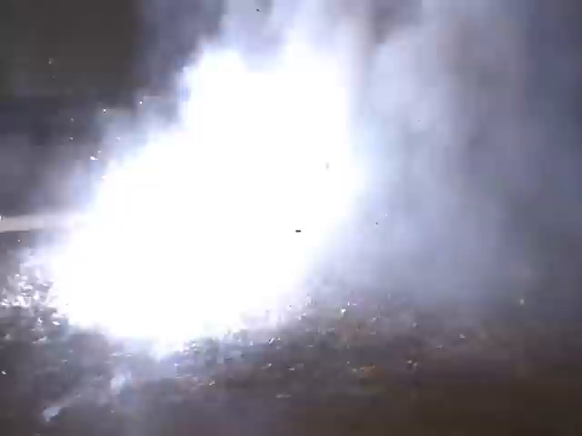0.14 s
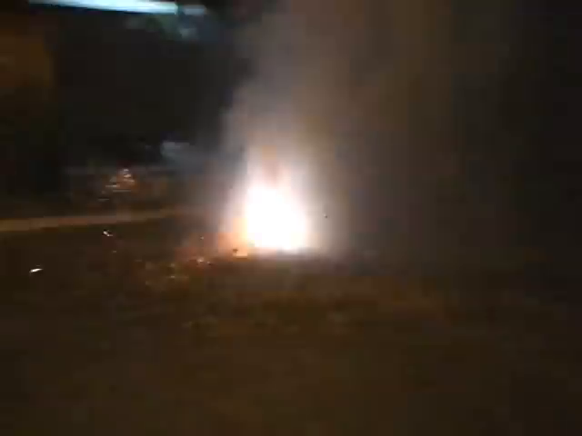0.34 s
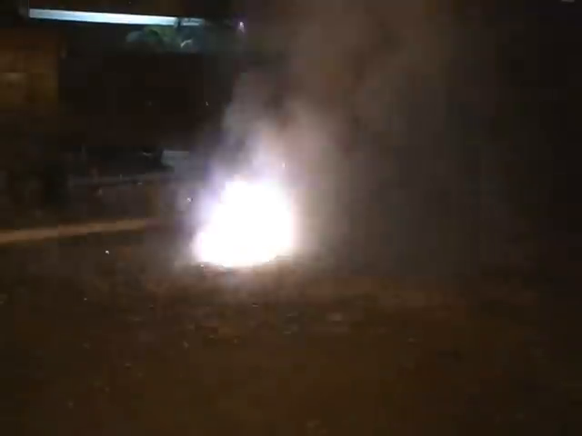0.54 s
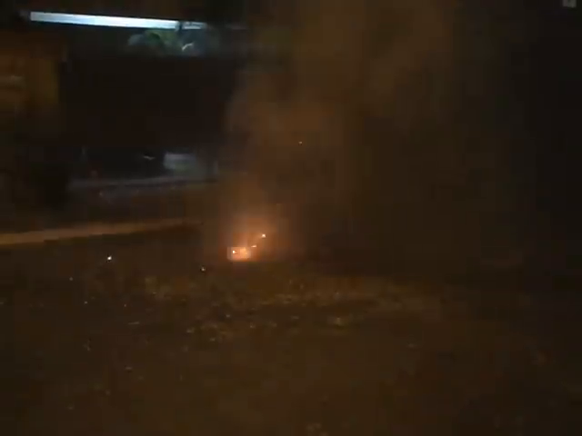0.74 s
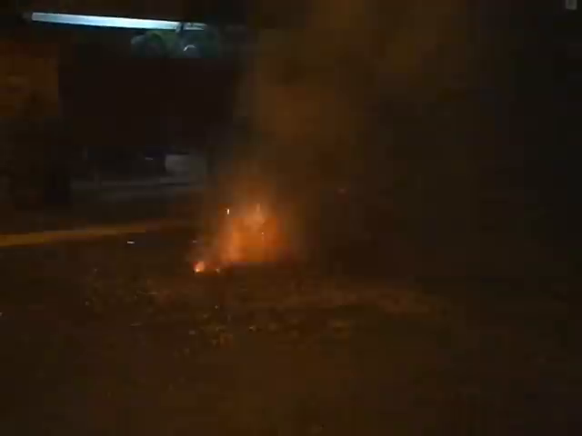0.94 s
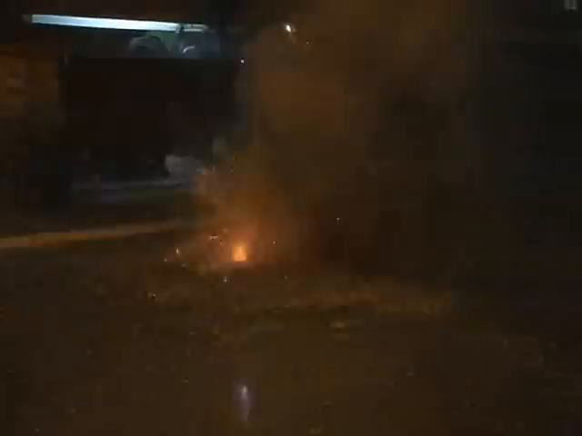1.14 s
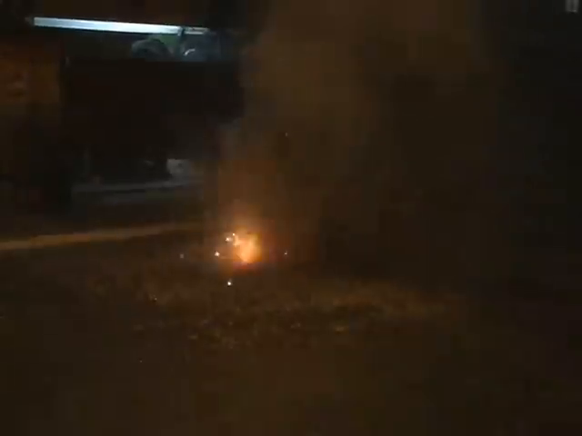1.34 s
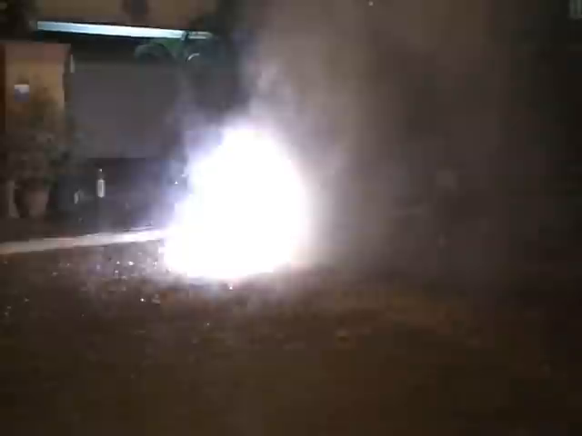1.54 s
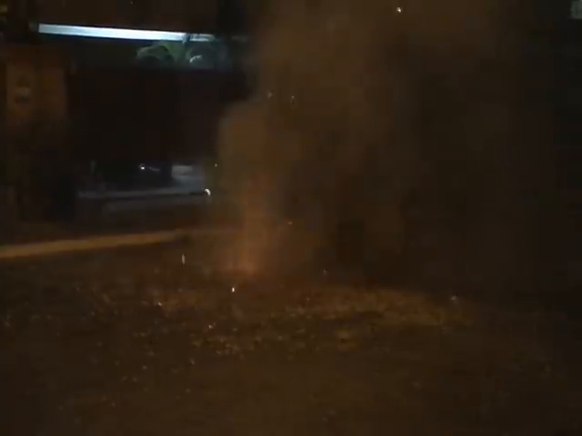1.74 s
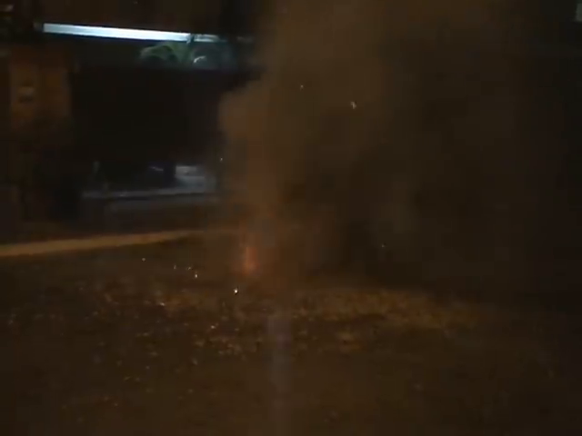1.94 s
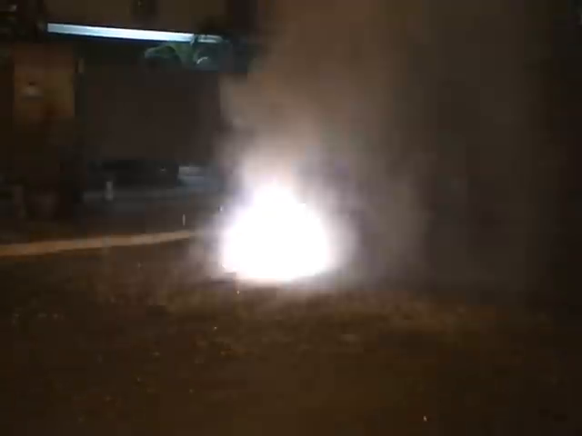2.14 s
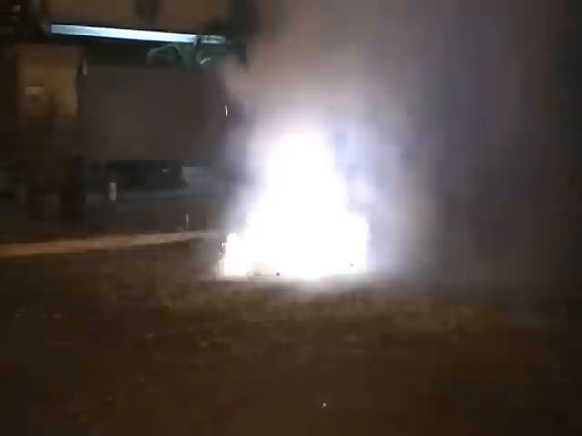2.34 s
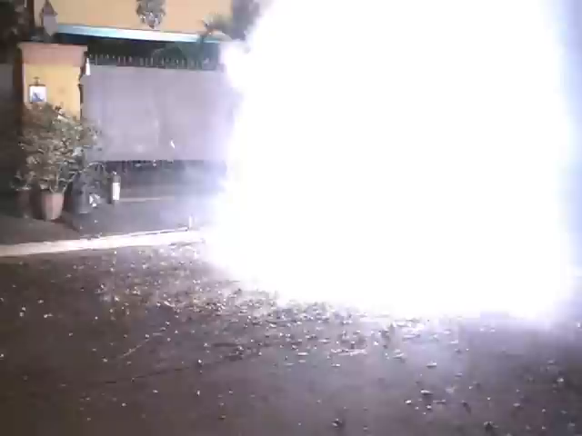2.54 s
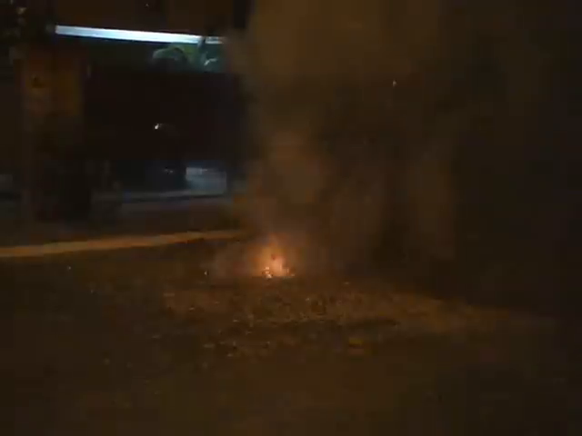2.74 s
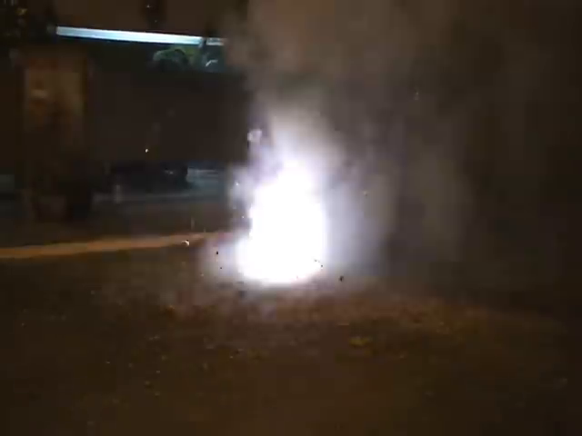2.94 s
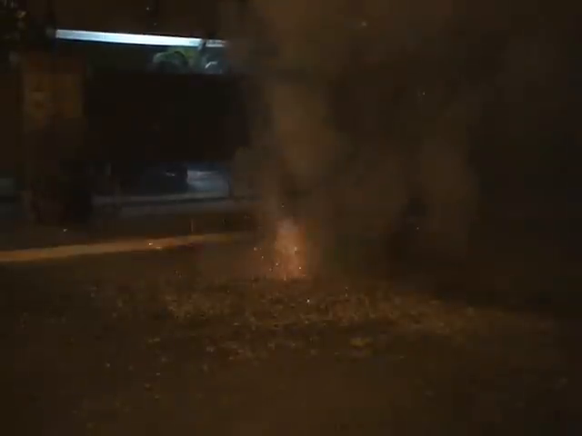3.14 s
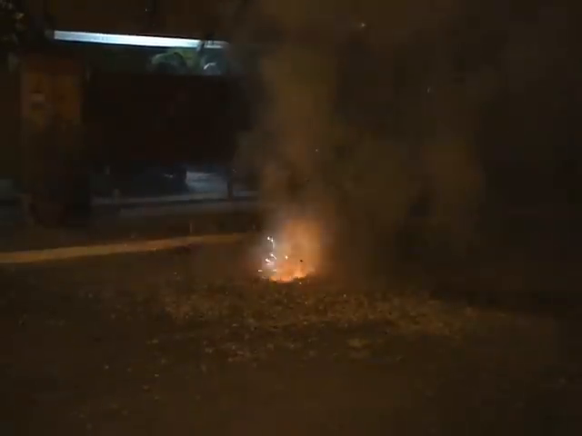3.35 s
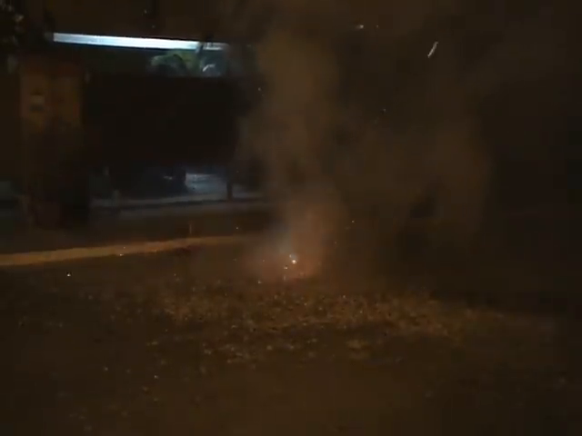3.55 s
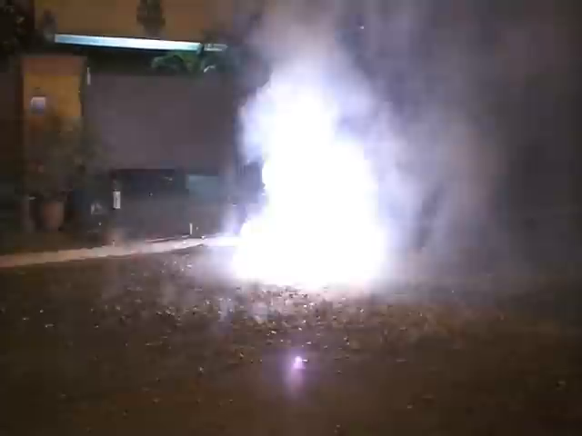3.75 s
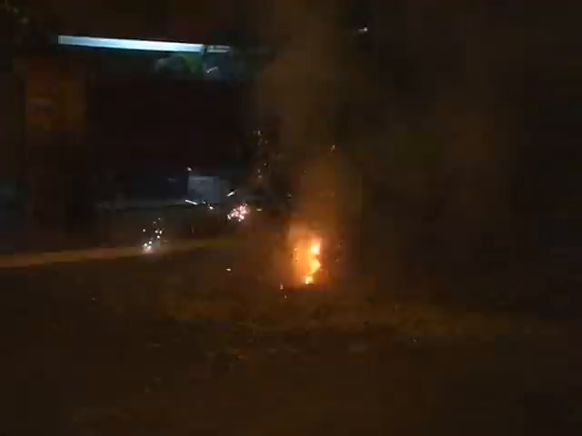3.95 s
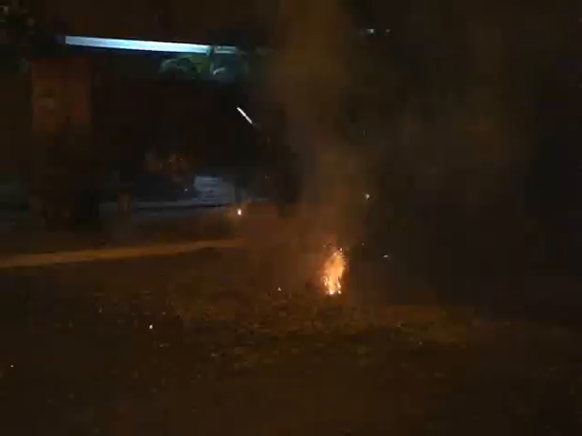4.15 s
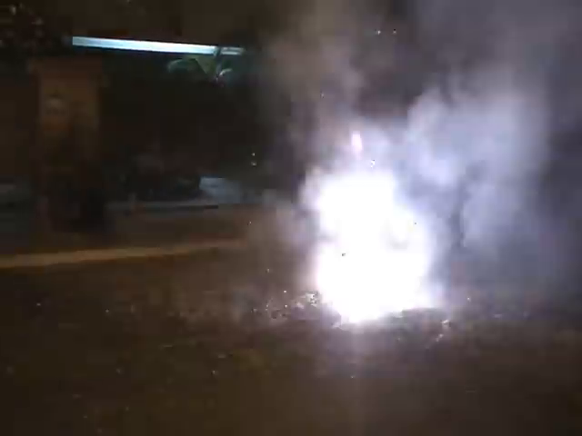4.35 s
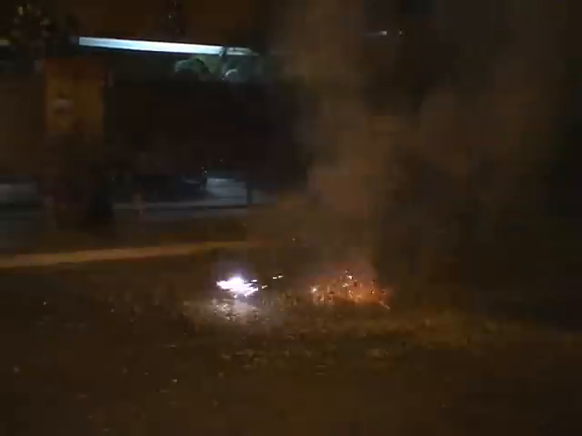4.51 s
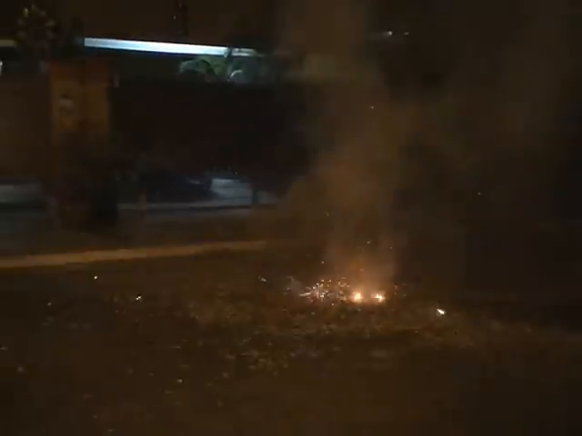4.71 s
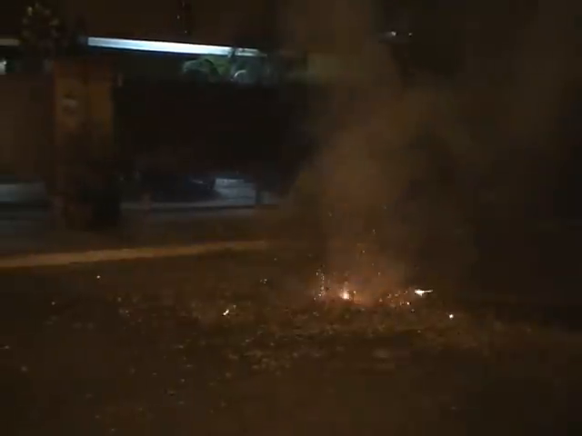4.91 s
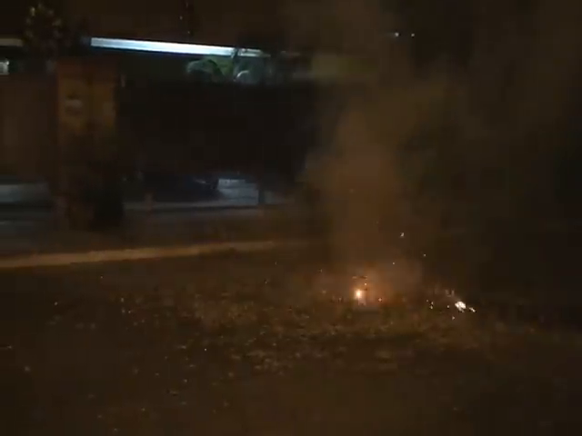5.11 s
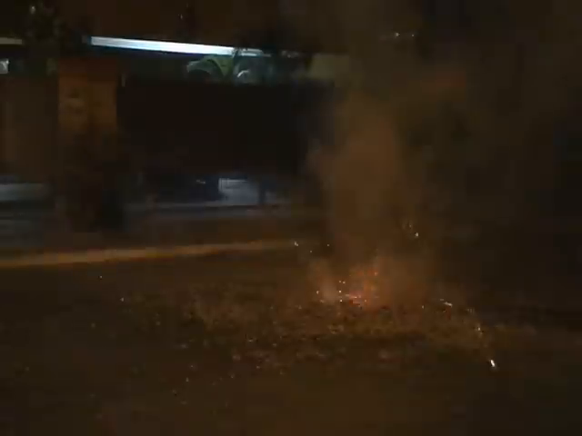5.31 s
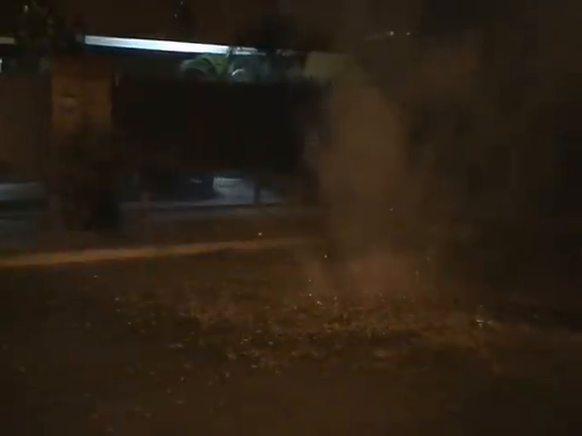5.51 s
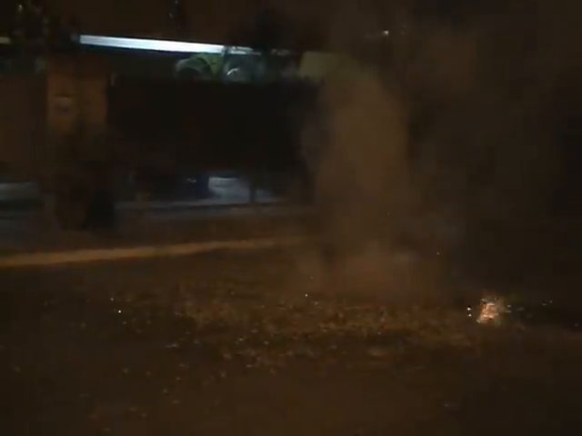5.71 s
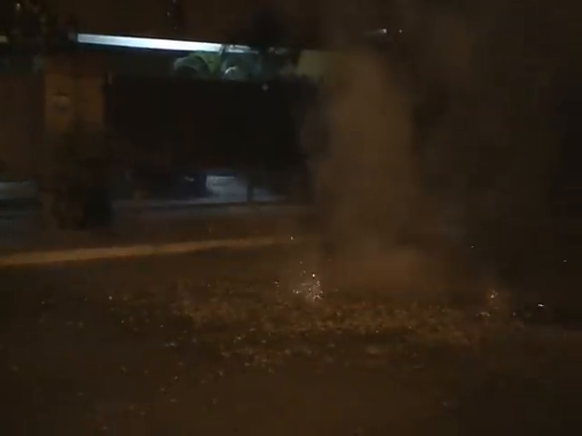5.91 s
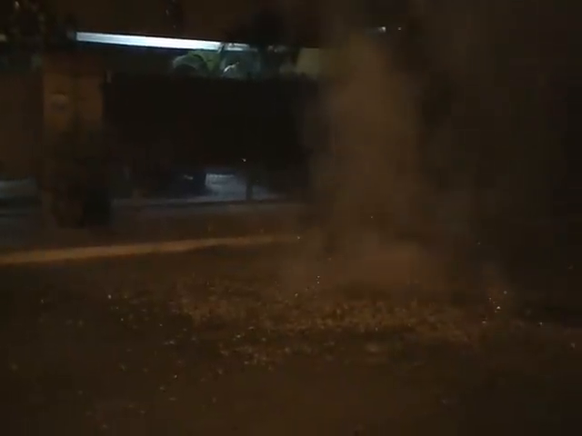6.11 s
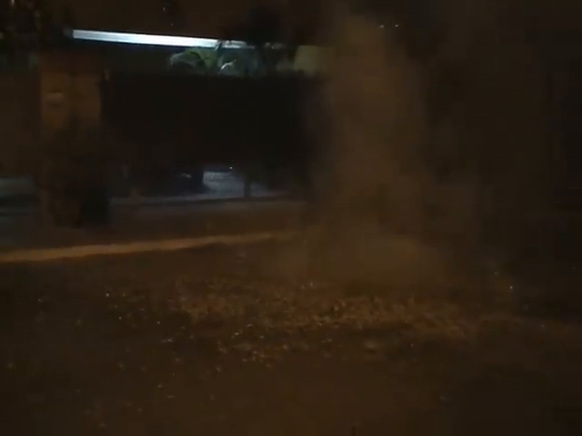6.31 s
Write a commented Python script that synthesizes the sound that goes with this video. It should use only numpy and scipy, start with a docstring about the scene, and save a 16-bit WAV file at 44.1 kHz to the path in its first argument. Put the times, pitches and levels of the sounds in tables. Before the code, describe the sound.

A long firecracker string explodes a few metres from overloaded stereo microphones on a street at night. It begins at 0 seconds with a sharp bang and a few quick followers, then more around 0.24 and 0.43. From 0.5 to 0.85 the cracks run together, and heavy thumping blasts hit near 0.93 and 1.0. Uneven clusters continue to 1.7, then a lull holds only a weak pop at 1.9. A deep, strong bang at 2.1 restarts the barrage, dense from 2.35 to 2.5 and 2.75 to 3.05. Scattered bangs follow until a thick, roaring run from 3.8 to 4.3. More bursts come from 4.5 to 4.75, and separate blasts from 4.85 to 5.4. A longer gap lets hollow house-front echoes fade toward a faint low rumble, before final cracks at about 5.84 to 5.98 and their decaying echo.

```python
"""A street at night, two microphones a few metres from a long string of firecrackers.
Each blast is a short pressure push with a deep thump; filtered noise and single reflections make
its echo between the house fronts. Overload flattens the peaks, so the bangs merge into a harsh
roar; where the fuse falters the echo dies away and the town's faint rumble is left."""
import sys
import numpy as np
from scipy import signal
from scipy.io import wavfile
from scipy.ndimage import uniform_filter1d

SR = 44100
rng = np.random.default_rng(int(sys.argv[2]) if len(sys.argv) > 2 else 0)


def put_to_file(sound):
    """Save the sound as 16-bit audio at rate SR, in the file named by the first command-line argument."""
    columns = np.atleast_2d(sound).T  # one column per channel
    safe = np.clip(columns, -1, 1)
    whole_steps = np.round(safe * 32767)
    wavfile.write(sys.argv[1], SR, whole_steps.astype(np.int16))


N = 280915  # length in samples

# crackers that stand out, most of them after a pause of the fuse:
# [t/s, level/dB before the street's gain, length of the push/ms, low thump level/dB]
SINGLE_BANGS = [ (0.000, 12.5, .29, -19), (0.237, 11, 0.22, -12), (0.429, 17, 0.23, -1),
                (0.928, 16.5, .2, 7.5), (0.995, 19, 0.24, 9), (1.157, 15, .17, -13), (1.408, 12, .19, 5),
                (1.583, 10, .19, 3), (1.675, 9, 0.21, 6), (1.716, 13.5, .2, 2), (1.915, 1.5, .18, -11),
                (2.1058, 15.5, 0.24, 10), (2.291, 11.5, .18, 5), (2.735, 14.5, 0.22, 3),
                (3.050, 15.5, 0.19, -2), (3.252, 6.5, 0.38, 3), (3.3895, 11.5, 0.28, -9),
                (3.715, 9.5, .21, -12), (4.302, 13, 0.22, -10), (4.5028, 12.5, 0.3, -13),
                (4.842, 10.5, .22, -2), (4.942, 14, .26, -7), (5.103, 14, .23, -1), (5.276, 12.5, 0.25, 2),
                (5.8371, 10.5, .2, -14), (5.979, 11, .29, -4)]
# stretches where the fuse runs freely and sets off one cracker after another:
# [first t/s, last t/s, middle level/dB before the street's gain, middle thump level/dB]
FUSE_RUNS = [ (0.054, 0.11, 13, -10), (0.251, 0.29, 9, -13), (0.50, 0.845, 9.5, -2), (1.039, 1.30, 9.5, -5),
             (1.44, 1.511, 2, -1), (2.139, 2.179, 8, -12), (2.352, 2.529, 12.5, -4), (2.61, 2.682, 5, -6),
             (2.78, 2.99, 13, -6), (3.437, 3.50, 10.5, -8), (3.80, 4.20, 15, -5), (4.58, 4.73, 12, -6),
             (5.344, 5.41, 9, -9), (5.861, 5.90, 3.5, -12)]


def crackers(spot_count=11):
    """The string jumps about as it burns: blasts leave from several spots, each with its own echoes."""
    spots = np.zeros((spot_count, N))
    thumps = np.zeros(N)
    echoes = [street() for _ in spots]
    fired = [tuple(row) for row in SINGLE_BANGS]
    for row in FUSE_RUNS:
        fired += run(*row)
    for k, (s, db, push_ms, thump_db) in enumerate(sorted(fired)):
        add(spots[k % spot_count], s, gain_of(db) * blast(push_ms))
        add(thumps, s, gain_of(thump_db) * thump())
    echoed = sum(signal.fftconvolve(spot[None], echo, axes=1)[:, :N] for spot, echo in zip(spots, echoes))
    return thumps + hollow(echoed)  # the thumps reach both microphones alike, without echo


FUSE_S = 0.062  # approximate spacing of the crackers in a run
FUSE_JITTER = 0.35  # largest share of FUSE_S by which an inner cracker comes early or late
STRENGTH_SPREAD_DB, THUMP_SPREAD_DB = 3.5, 8  # plus or minus: no two crackers are packed alike
PUSH_MS, PUSH_AT_DB = 0.2, 11  # middle length of the push for a blast of this level
PUSH_DOUBLES_DB = 25  # a stronger charge pushes for longer: twice as long for this much more level
PUSH_SPREAD_OCTAVES = 0.32  # plus or minus


def run(first_s, last_s, db, thump_db):
    """One run of the fuse, as rows like those of SINGLE_BANGS: uneven in time, charge, push and thump."""
    count = 1 + int(np.ceil((last_s - first_s) / FUSE_S - 0.5))
    late, charge, push, low = rng.uniform(-1, 1, (count, 4)).T
    times = np.linspace(first_s, last_s, count)
    times[1:-1] += FUSE_JITTER * FUSE_S * late[1:-1]
    strength_db = db + STRENGTH_SPREAD_DB * charge
    octaves = (strength_db - PUSH_AT_DB) / PUSH_DOUBLES_DB + PUSH_SPREAD_OCTAVES * push
    push_ms = PUSH_MS * 2 ** octaves
    return list(zip(times, strength_db, push_ms, thump_db + THUMP_SPREAD_DB * low))


def blast(push_ms, size=512):
    """A shock front, a short push and a longer suction, with unit energy."""
    u = np.arange(size) / SR * 1000 / push_ms  # time in push lengths
    decay = np.exp(-u)
    wave = (1 - u) * decay
    wave -= wave.sum() * decay / decay.sum()  # push and suction cancel
    return wave / np.linalg.norm(wave)


def thump(lowest_hz=47.74, highest_hz=109.12, t60=0.046, size=6000):
    """The ball of hot gas swells and falls back: a deep sine that dies within a few cycles."""
    t = np.arange(size) / SR
    hz = rng.uniform(lowest_hz, highest_hz)
    return np.sin(2 * np.pi * hz * t) * gain_of(-60 * t / t60)


# what the street gives back of a blast: [f/Hz, level/dB]
STREET_COLOUR = [(25, -17), (60, -16), (130, -8.5), (260, -4), (500, -2.5), (900, -1.5), (1650, -1.07),
                 (2150, -4), (2700, -5), (4500, -8.5), (8000, -8.5), (15000, -13)]
# how long the house fronts ring: [f/Hz, t60/s]
FRONT_RING = [(80, 0.79), (300, 0.42), (900, 0.6), (2500, 0.57), (6000, 0.57), (14000, 0.46)]
# likeness of the echoes at the two microphones: [f/Hz, correlation/1]
ECHO_LIKENESS = [(60, 1), (300, 1), (700, 0.96), (1400, .89), (3000, 0.75), (7000, 0.63), (15000, 0.35)]
# far echoes come back thin and dull: [f/Hz, level/dB]
FAR_COLOUR = [(100, -5), (400, 1.5), (900, -1.5), (2500, 0.5), (8000, -8), (15000, -14)]


def street(direct_db=20, wall_db=14, wall_fall_db=15, wall_s=0.09, wall_count=12,
           far_db=-32, far_t60=2.5, slap_db=-39, slap_s=0.5, slap_spread_s=0.011):
    """Paths to the two microphones: the direct one, single walls, dense scatter and far houses."""
    t = np.arange(SR) / SR  # echoes end after one second
    hz, age, (a, b) = signal.stft(rng.standard_normal((2, len(t))), SR, nperseg=256)
    same = np.clip(read(ECHO_LIKENESS, hz), 0, 1)[:, None]
    mid = a * np.sqrt((1 + same) / 2)
    side = b * np.sqrt((1 - same) / 2)

    near = gain_of(-60 * age / read(FRONT_RING, hz)[:, None])
    far = gain_of(far_db - 60 * age / far_t60)
    # a building down the street
    slap = gain_of(slap_db) * np.exp(-((age - slap_s) / slap_spread_s) ** 2)
    distant = np.hypot(far, slap) * gain_of(read(FAR_COLOUR, hz))[:, None]
    fade = clumps(age) * np.hypot(near, distant)
    scatter = np.array([mid + side, mid - side]) * fade
    paths = signal.istft(scatter, SR, nperseg=256)[1][:, :len(t)]

    paths[:, 0] += gain_of(direct_db)
    for delay, bearing in rng.random((wall_count, 2)):
        lag = (bearing - 0.5) * 0.00021  # s: a wall to one side reaches one microphone first
        reflection = [gain_of(wall_db - wall_fall_db * delay)]
        for path, sign in zip(paths, (-1, 1)):
            add(path, delay * wall_s + sign * lag / 2, reflection)
    return colour(paths, STREET_COLOUR)


def clumps(age, lumpy_db=1.0, ground_db=2.5, ground_s=0.0066,
           gap_db=4, gap_s=0.013, gap_width_s=0.0041, size=3):
    """Echoes come in clumps: first the ground and kerb, then a short lull before the house fronts."""
    lumps = uniform_filter1d(rng.standard_normal(len(age)), size) * np.sqrt(size)
    ground = ground_db * np.exp(-(age / ground_s) ** 2)
    lull = gap_db * np.exp(-((age - gap_s) / gap_width_s) ** 2)
    return gain_of(lumpy_db * lumps + ground - lull)


# hollow tones of the porches and gates along the street:
# [f/Hz, width/Hz, level/dB relative to the sound that excites them]
PORCH_TONES = [(266, 15, -6), (344, 21, -7), (519, 17, -5.5), (595, 24, -8.5), (714, 18.3, -5),
               (830, 36, -11.5), (1026, 61, -13), (1261, 57, -24)]


def hollow(x):
    """Adds the resonances that the blasts and echoes from every spot share."""
    tones = 0
    for hz, width_hz, db in PORCH_TONES:
        tones = tones + gain_of(db) * signal.lfilter(*signal.iirpeak(hz, hz / width_hz, SR), x)
    return x + tones


# colour of the low rumble of the town at night: [f/Hz, level/dB]
TOWN_COLOUR = [(20, -6), (45, -2), (120, 1), (400, -10), (900, -10), (3000, -26), (15000, -45)]


def town(db=-44):
    """A faint steady rumble of filtered noise, heard only in the lulls; db is its RMS level."""
    noise = colour(rng.standard_normal((1, N)), TOWN_COLOUR)
    return gain_of(db) * noise / noise.std()


def scene():
    """Sound pressure at the two microphones, 1 being their overload level."""
    return crackers() + town()


# gain of the side signal, the recorder's stereo width: [f/Hz, level/dB]
SIDE_GAIN = [(30, -8), (70, -2), (150, 0.5), (400, 4), (1000, 2.5), (2200, 3.5), (4500, 2.5), (12000, -2.5)]


def widen(x):
    """The recorder narrows the bass and the extreme treble and spreads what lies between."""
    mid = (x[:1] + x[1:]) / 2
    side = colour((x[:1] - x[1:]) / 2, SIDE_GAIN)
    return np.vstack([mid + side, mid - side])


def smear(x, hz=2600, width_hz=1100):
    """The recorder's filters delay one band a little, so flattened peaks ripple and overshoot."""
    band = signal.lfilter(*signal.iirpeak(hz, hz / width_hz, SR), x)
    return x - 2 * band  # an all-pass: only the phase changes


# colour of the recorder after the overload: [f/Hz, level/dB]
RECORDER_COLOUR = [(15, -18), (35, -11), (70, -3), (250, 1), (1000, -0.5), (2500, -2), (6000, -1.5),
                   (10000, -1.5), (15000, -3)]
EDGE_HZ = 15750  # upper band limit of the recorder


def record(dry, knee=4.3, ceiling_db=-5.0, left_db=0.3, order=2):
    """The microphone stage flattens the peaks; then the recorder's colour, full scale and band limit."""
    fine = signal.resample_poly(dry, order, 1, axis=1)  # oversampled against aliasing
    flat = fine / (1 + abs(fine) ** knee) ** (1 / knee)  # a higher knee bends more sharply
    wide = widen(signal.resample_poly(flat, 1, order, axis=1))
    out = colour(smear(wide), RECORDER_COLOUR)
    gains = gain_of([[ceiling_db + left_db], [ceiling_db - left_db]])  # left, right
    out = np.clip(out * gains, -1, 1)
    low_pass = signal.firwin(511, EDGE_HZ, window=("kaiser", 8), fs=SR)
    return signal.oaconvolve(out, low_pass[None], "same")


def gain_of(db):
    """Decibels to amplitude."""
    return 10 ** (np.asarray(db) / 20)


def read(points, hz):
    """A table's value at hz, interpolated on a log-frequency axis."""
    f, value = np.transpose(points)
    return np.interp(np.log(hz + 1), np.log(f), value)


def add(mix, s, sound):
    """Adds a sound to mix in place at time s, cut off at the end."""
    part = mix[max(round(s * SR), 0):][:len(sound)]
    part += sound[:len(part)]


def colour(x, points, size=4096):
    """Causal minimum-phase filter with the given spectrum."""
    log_gain = np.log(gain_of(read(points, abs(np.fft.fftfreq(size, 1 / SR)))))
    spectrum = np.exp(np.conj(signal.hilbert(log_gain)))  # the phase follows from the log gain
    taps = np.fft.ifft(spectrum).real[:size // 2]
    return signal.oaconvolve(x, taps[None], axes=1)[:, :x.shape[1]]


dry = scene()
out = record(dry)
put_to_file(out)
```